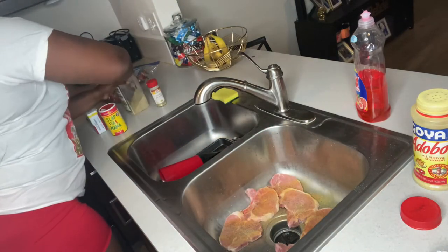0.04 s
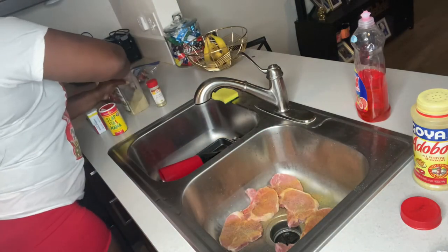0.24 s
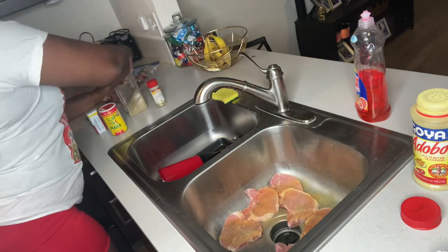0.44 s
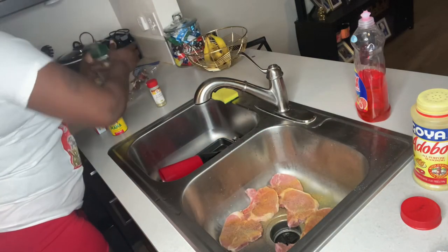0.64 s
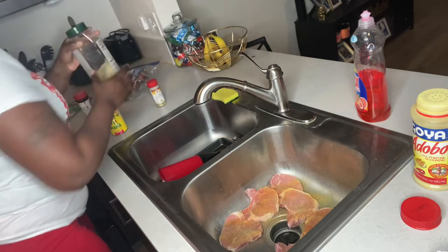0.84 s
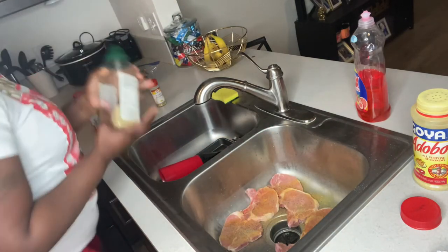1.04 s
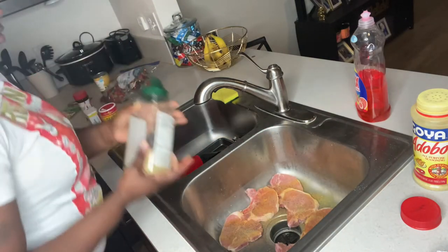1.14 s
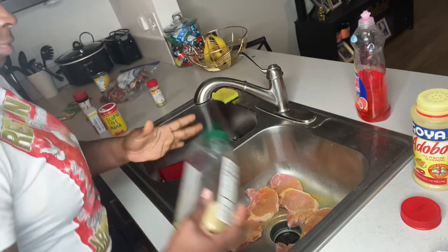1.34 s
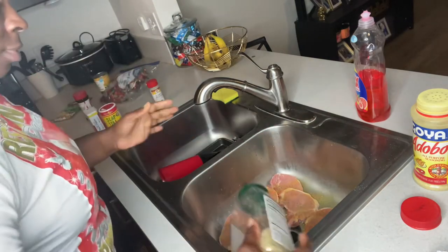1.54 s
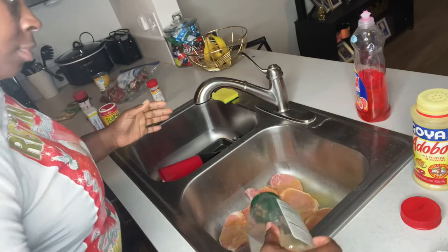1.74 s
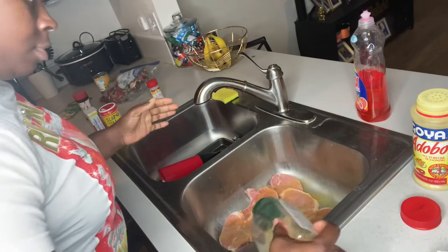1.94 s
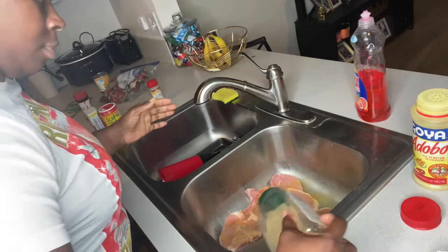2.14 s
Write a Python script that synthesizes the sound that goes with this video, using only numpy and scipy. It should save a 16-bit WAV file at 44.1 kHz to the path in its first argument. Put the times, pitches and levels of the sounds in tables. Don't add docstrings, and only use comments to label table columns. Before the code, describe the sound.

A plastic spice jar's flip lid opens close to the microphone: a light click at 0.1 seconds, then a loud, sharp double crack at 0.23 with tiny lid knocks, a low worktop boom and hollow sink throb fading by 0.4. The hard kitchen echoes briefly. Faint powder slides from 0.8; light taps near 1.5 lead into soft, hissing shakes until the end. A fridge hums quietly throughout.

```python
import sys
import numpy as np
from scipy import signal
from scipy.io import wavfile

SR = 44100
rng = np.random.default_rng(int(sys.argv[2]) if len(sys.argv) > 2 else 0)


def invert_db(level):
    return 10 ** (np.asarray(level, dtype=float) / 20)


def store_pcm(level_fs):
    pcm = np.round(np.clip(level_fs, -1, 1) * 32767).astype(np.int16)
    wavfile.write(sys.argv[1], SR, np.atleast_2d(pcm).T)


N = 97020

# [Hz, dB rms]
FRIDGE_LINES = [(59.84, -47), (118.5, -58), (7860, -86), (178.5, -77.5), (244, -68), (258.5, -68),
                (298.3, -73), (358, -73.5), (479, -80)]
HUM_WOBBLE_DB, HUM_PAN_DB = 1.75, 3.5
# [Hz, dB]
AIR_COLOUR = [(18, -31), (30, -7.5), (83, -2), (355, -14), (645, -31), (4200, -52), (8040, -53.5),
              (12500, -54), (15000, -86)]
AIR_DB = -53.5
# [Hz, -1..1]
AIR_LIKENESS = [(60, 0.61), (180, -0.33), (550, -0.57), (1650, 0.097), (4500, -0.21), (7000, 0.6),
                (10000, .5), (13000, -.2)]
# [Hz, dB]
AIR_BALANCE = [(60, 6.5), (240, 2.7), (950, 4.5), (3770, 1), (15000, 3.5)]

# [Hz, dB per Hz]
ROOM_COLOUR = [(59, -33.5), (100, -4.5), (462, -12.5), (512, -8), (630, -10), (1440, -5), (6120, -14.5),
               (10300, -12.5), (14000, -25.5)]
# [Hz, s]
ROOM_T60 = [(150, 0.65), (700, 0.68), (3000, 0.7), (6000, 0.64), (11000, .38)]
# [Hz, -1..1]
ROOM_LIKENESS = [(60, 1), (180, 0.33), (550, -0.31), (1650, -0.14), (4500, -0.12), (7000, 0.6), (10000, .5),
                 (13000, 0.54)]
# [Hz, dB]
ROOM_BALANCE = [(60, -3), (240, 8.5), (950, 2), (3770, 5), (15000, -5)]
EARLY_DB, EARLY_S = 4.5, 0.0067
ROOM_GAP_S = .0012
EARLIER_DB, EARLIER_CUT_HZ = -55, 1100
SLIDE_ROOM_DB = -45
# [s, dB]
ECHOED = [
    (0.1048, -50.5),
    (0.2255, -32),
]

# [s, dB, dB, s, s]
SLIDES = [(.001, -80, -71.5, .006, .008), (.109, -74.5, -55.5, 0.0073, 0.0021),
          (0.227, -54.5, -46.5, 0.0049, 0.0057), (0.773, -77.5, -92.5, 0.016, 0.028),
          (0.836, -71.5, -76, 0.044, 0.072), (1.019, -78, -79.5, 0.034, 0.0534),
          (1.14, -78, -73, 0.043, 0.064), (1.21, -85, -85, 0.026, 0.035), (1.29, -73, -67.5, 0.026, 0.031),
          (1.53, -75.5, -64.5, 0.023, 0.049), (1.586, -64, -64.5, 0.037, 0.055),
          (1.702, -67.5, -76.5, 0.022, 0.057), (1.754, -64.5, -64, 0.026, 0.039),
          (1.85, -69.5, -72, 0.0197, 0.023), (1.949, -59.5, -65.5, 0.036, 0.026),
          (2.051, -66.5, -79.5, .04, 0.049), (2.145, -60.5, -65.5, 0.027, .035)]
GRAINS_PER_S, GRAIN_SPREAD_DB = 4500, 2.5
BODY_LEAD_S, LEAD_PER_OCTAVE_S = .008, .009
# [Hz, dB per Hz]
HISS_COLOUR = [(1500, -18), (3000, -9), (5500, -3), (7500, -5), (10000, 6.5), (12500, 0), (15000, -10)]
# [Hz, dB per Hz]
BODY_COLOUR = [(300, -20.5), (600, 8.5), (1200, 3), (1800, -2.5), (2400, -3), (4000, -4.5), (6000, -9.5),
               (9000, -37)]
# [Hz, -1..1]
SLIDE_LIKENESS = [(180, 1), (550, -0.22), (1650, -0.56), (4500, 0.66), (7000, 0.29), (10000, 0.68),
                  (13000, 0.79)]
# [Hz, dB]
SLIDE_BALANCE = [(60, -2.5), (240, 6), (950, 2.5), (3770, -0.5), (15000, -2)]
# [s, dB, Hz, s]
CLUMPS = [(0.2176, -33, 2410, 0.0031), (0.222, -44, 3960, 0.0085), (0.81, -76, 2450, 0.015),
          (0.96, -68, 850, 0.003), (1.123, -70, 1760, 0.0045), (1.13, -68.5, 1600, 0.0037),
          (1.135, -76, 5270, 0.0046), (1.253, -75, 1850, 0.013), (1.61, -65, 510, 0.032),
          (1.887, -61, 304, 0.022), (1.946, -68, 515, 0.03), (2.08, -67, 485, 0.025),
          (2.144, -67.5, 2850, 0.0083)]
# [s, dB, Hz, s]
THUDS = [(1.52, -64.5, 1900, 0.018), (1.533, -70, 3700, 0.027), (1.551, -65.5, 2700, 0.033),
         (1.604, -70.5, 795, 0.028), (1.62, -66.5, 1500, 0.018), (1.708, -68.5, 806, 0.0085),
         (1.767, -71, 1404, 0.034), (1.85, -71.5, 1300, 0.015), (1.925, -63.5, 896, 0.028),
         (1.945, -69, 1480, 0.014), (2.13, -69, 1100, 0.03), (2.152, -77, 1550, 0.0094)]
CLUMP_CYCLES, THUD_CYCLES = 12, 4.0
# [s, dB, Hz, s, Hz]
TAPS = [(.1115, -41, 7400, 0.001, 0), (.117, -50, 1500, 0.0014, 0), (1.03, -52.5, 185, 0.016, 0),
        (1.125, -53.5, 165, .014, 0), (1.485, -67, 1562, 0.0033, 0), (1.495, -68, 2100, .004, 0),
        (1.505, -54, 1450, 0.0017, 0), (1.516, -60, 1466, 0.0044, 0), (1.536, -63, 1160, 0.0046, 0),
        (1.552, -65, 2860, .005, 0), (1.561, -60, 2330, .003, 0), (1.575, -59, 2315, 0.0078, 0),
        (1.565, -62, 810, .004, 0), (1.576, -60, 807, 0.0034, 0), (1.637, -63, 784, 0.0052, 0)]

# [s, dB, Hz, s, Hz]
BOOMS = [
    (0.263, -30.5, 60.38, 0.014, 61),
    (.365, -40.5, 46.12, 0.022, 6.3),
]
# [s, dB, Hz, s, Hz]
BASIN = [
    (.233, -31.5, 220, 0.0063, 10.54),
    (.245, -28, 455.8, 0.0073, 3.96),
    (.277, -46.5, 428, 0.005, 5.9),
    (.3, -42.5, 254.9, 0.018, 5),
    (.285, -38, 215, 0.011, 5.1),
    (.327, -47, 458.5, 0.01, 5.25),
    (.374, -50.5, 435, .01, 6.7),
]
BOOM_SAG_S, BASIN_PAN_DB = 0.012, 8

# [s, dB, dB]
CLICK = [
    (.1043, -30, -8),
    (.1057, -41, 13),
]
# [Hz, dB, s]
CLICK_LID = [(2550, 7, .007), (3200, -5, .004), (4500, -9, .005), (7300, -12, .01), (9200, -5, .006),
             (11200, -3, .005), (13000, -7, .004), (15300, -18, .002)]
# [Hz, dB, s]
CLICK_BOX = [(957, 3, 0.035), (1588, -9, 0.026), (230, -19, 0.038)]
# [s, dB, dB]
SNAP = [
    (.2258, -8.5, -14),
    (.22626, -9, -14),
]
# [s, dB, dB]
CONTACTS = [
    (0.2274, -20.5, 11.5),
    (.2311, -16, -12),
    (0.2348, -26.5, 0.5),
    (0.2392, -19.5, -0.5),
]
# [Hz, dB, s]
LID = [(2350, 2, .006), (1700, -10, .007), (3200, -5, .005), (4250, -4, .006), (5300, -9, .005),
       (6800, -9, .005), (9000, -5, .006), (11500, -9, .004), (14800, -13, .002)]
# [Hz, dB, s]
BOX = [(946, -5.5, 0.023), (1280, -8, 0.036), (467, -13, 0.2), (227, -13.5, 0.12), (178.4, -22.5, 0.051)]
RING_DB, CONTACT_SPREAD_DB, CRACK_TOP_HZ = -5, 1.0, 13500
LID_PAN_DB = 1.3
LOW_LEFT_DB, LOW_SPLIT_HZ = 3, 460

# [Hz, Hz]
PORTS_ALIKE_HZ = [7300, 10300]
MID_TOP_HZ, MID_ROLL_HZ, SIDE_TOP_HZ = 14300, 12600, 15100
SIDE_LIFT_DB, MIC_LOW_HZ = 3.5, 38.6


def rms_one(x):
    return x / np.sqrt(np.mean(x ** 2) + 1e-20)


def at_hz(points, hz):
    table_hz, value = np.transpose(points)
    return np.interp(np.log(hz), np.log(table_hz), value)


def lowpass(x, order, hz):
    return signal.sosfilt(signal.butter(order, hz, fs=SR, output="sos"), x)


def bandpass(x, low_hz, high_hz):
    return signal.sosfilt(signal.butter(2, [low_hz, high_hz], "band", fs=SR, output="sos"), x)


def cut(x, hz, kind="low"):
    return signal.sosfilt(signal.cheby2(16, 70, hz, kind, fs=SR, output="sos"), x)


def drift(rate):
    r = np.exp(-80 * np.pi * rate / SR)
    noise = rng.standard_normal(N // 40 + 2002)
    slow = signal.lfilter([1], [1, -2 * r, r * r], noise)[2000:]
    return np.interp(np.arange(N) / 40, np.arange(len(slow)), rms_one(slow))


def ring(clicks, hz, t60):
    r = invert_db(-60 / (t60 * SR))
    w = 2 * np.pi * hz / SR
    return signal.lfilter([0, np.sin(w)], [1, -2 * r * np.cos(w), r * r], clicks + 1e-18)


def swell(crest, rise, fall):
    t = np.arange(N) / SR - crest
    return np.exp(-.5 * (t / np.where(t < 0, rise, fall)) ** 2)


def bands(source, spectrum, likeness, balance, shape):
    out = 0
    edges = 28 * 2 ** np.arange(0, 9.4, .5)
    for k, (low, high) in enumerate(zip(edges, edges[1:])):
        hz = np.sqrt(low * high)
        mid, side = bandpass(source[k % 2], low, high)
        alike = np.clip(at_hz(likeness, hz), -1, 1)
        pan = invert_db(at_hz(balance, hz) / 2 * np.array([[1], [-1]]))
        pair = np.sqrt(1 + alike) * mid + np.sqrt(1 - alike) * side * [[1], [-1]]
        out = out + invert_db(at_hz(spectrum, hz)) * pan * shape(hz) * pair
    return out


def sagging_tones(rows):
    t = np.arange(N) / SR
    out = np.zeros(N)
    for s, db, hz, length, extra_hz in rows:
        sag = np.exp(-np.maximum(t - s + 2 * length, 0) / BOOM_SAG_S)
        phase = 2 * np.pi * np.cumsum(hz + extra_hz * sag) / SR
        out += invert_db(db) * swell(s, length, 0.8 * length) * np.cos(phase)
    return out


def fridge():
    t = np.arange(N) / SR
    lines = np.zeros(N)
    for k, (hz, db) in enumerate(FRIDGE_LINES, 1):
        level = invert_db(db + 1.5 + HUM_WOBBLE_DB * k ** .5 * drift(3.0))
        lines += level * np.sin(2 * np.pi * hz * t + 0.19 * drift(9) + rng.uniform(0, 6))
    noise = rng.standard_normal((2, 2, N))
    air = bands(noise, AIR_COLOUR, AIR_LIKENESS, AIR_BALANCE, lambda hz: invert_db(1.5 * drift(24)))
    return lines * invert_db(HUM_PAN_DB / 2 * np.array([[1], [-1]])) + invert_db(AIR_DB) * rms_one(air)


def kitchen_echo():
    t = np.arange(SR) / SR
    scatter = 1 + invert_db(EARLY_DB) * np.exp(-t / EARLY_S)

    def dying(hz):
        return invert_db(-60 * t / at_hz(ROOM_T60, hz)) * scatter

    out = bands(rng.standard_normal((2, 2, SR)), ROOM_COLOUR, ROOM_LIKENESS, ROOM_BALANCE, dying)
    tail = out[:, SR // 20:SR // 10]
    return out / np.sqrt(np.mean(tail ** 2)) * (1 - np.exp(-t / 0.00088))


def reverberation(slides):
    room = kitchen_echo()
    strikes = np.zeros(N)
    for s, db in ECHOED:
        strikes[int((s + ROOM_GAP_S) * SR)] = invert_db(db)
    sent = strikes[None] + invert_db(SLIDE_ROOM_DB) * slides.mean(axis=0)
    wet = signal.fftconvolve(sent, room, axes=1)[:, :N]
    earlier = room[:, SR // 20:SR // 20 + SR // 2]
    wet[:, :SR // 2] += invert_db(EARLIER_DB) * lowpass(earlier, 4, EARLIER_CUT_HZ)
    return wet


def clumps():
    noise = rng.standard_normal((2, N)) + rng.standard_normal(N)
    out = np.zeros((2, N))
    for rows, cycles in [(CLUMPS, CLUMP_CYCLES), (THUDS, THUD_CYCLES)]:
        for s, db, hz, length in rows:
            out += invert_db(db) * swell(s, length / 2, length) * rms_one(ring(noise, hz, cycles / hz))
    return out


def powder():
    size = (2, 2, N)
    t = np.arange(N) / SR
    strength = invert_db(GRAIN_SPREAD_DB * np.minimum(rng.exponential(1, size), 5))
    hits = strength * rng.choice([-1, 1], size)
    grains = hits * (rng.random(size) < GRAINS_PER_S / SR)
    hiss = sum(invert_db(db) * swell(s, rise, fall) for s, db, _, rise, fall in SLIDES)
    body = sum(invert_db(db) * swell(s - BODY_LEAD_S, rise, fall) for s, _, db, rise, fall in SLIDES)

    def body_shape(hz):
        late = np.interp(t - LEAD_PER_OCTAVE_S * np.log2(hz / 2000), t, body)
        return late * invert_db(0.78 * drift(48))

    bright = bands(grains, HISS_COLOUR, SLIDE_LIKENESS, SLIDE_BALANCE, lambda hz: invert_db(1.3 * drift(30)))
    dull = bands(grains[..., ::-1], BODY_COLOUR, SLIDE_LIKENESS, SLIDE_BALANCE, body_shape)
    return hiss * rms_one(bright) + rms_one(dull) * np.sqrt(np.mean(body ** 2)) + clumps()


def lump_taps():
    return sagging_tones(TAPS) * invert_db([[1.5], [-1.5]])


def worktop():
    return sagging_tones(BOOMS) * invert_db([[1.8], [-1.8]])


def sink_basin():
    return sagging_tones(BASIN) * invert_db([[BASIN_PAN_DB / 2], [-BASIN_PAN_DB]])


def knocks(rows, lid, box):
    s, db, box_db = np.transpose(rows)
    out = np.zeros(N)
    luck = rng.normal(0, CONTACT_SPREAD_DB, (len(s), len(lid + box)))
    for k, (hz, level_db, t60) in enumerate(lid + box):
        share_db = box_db * (k >= len(lid))
        clicks = np.zeros(N)
        clicks[(s * SR).astype(int)] = -invert_db(db + level_db + RING_DB + luck[:, k] + share_db)
        out += ring(clicks, hz, t60)
    return bandpass(out, 150, CRACK_TOP_HZ)


def flip_lid():
    contacts = cut(knocks(CONTACTS, LID, BOX), MID_TOP_HZ)
    return knocks(SNAP, LID, BOX) + contacts + knocks(CLICK, CLICK_LID, CLICK_BOX)


def microphone_ports(x):
    mid, side = (x[0] + x[1]) / 2, (x[0] - x[1]) / 2
    mid = lowpass(cut(mid, MID_TOP_HZ), 4, MID_ROLL_HZ)
    below_gap = cut(side, PORTS_ALIKE_HZ[0] * 1.1)
    above_gap = cut(cut(side, SIDE_TOP_HZ), PORTS_ALIKE_HZ[1] * .95, "high")
    side = below_gap + invert_db(SIDE_LIFT_DB) * above_gap
    return np.array([mid + side, mid - side])


def scene():
    slides = powder()
    lid = flip_lid()
    diffuse = microphone_ports(fridge() + reverberation(slides) + slides + lump_taps())
    diffuse += lowpass(lid, 2, LOW_SPLIT_HZ) * (invert_db([[LOW_LEFT_DB], [-2 * LOW_LEFT_DB]]) - 1)
    right = np.concatenate([np.zeros(1), lid[:-1]])
    direct = np.array([lid * invert_db(LID_PAN_DB), right * invert_db(-LID_PAN_DB)])
    return direct + worktop() + sink_basin() + diffuse


def top_cut(x):
    return signal.sosfilt(signal.butter(12, 16530, fs=SR, output="sos"), x)


def record(dry):
    mix = signal.sosfilt(signal.butter(4, MIC_LOW_HZ, "high", fs=SR, output="sos"), dry)
    return top_cut(mix)


dry = scene()
out = record(dry)
store_pcm(out)
```